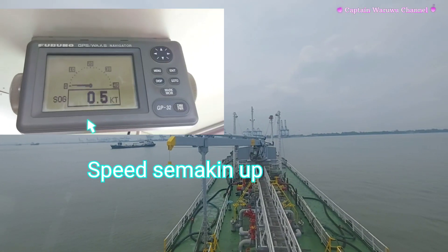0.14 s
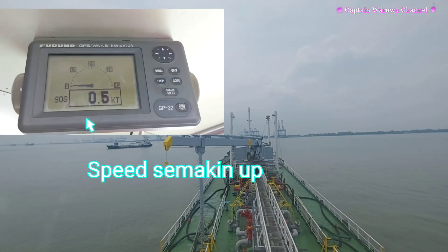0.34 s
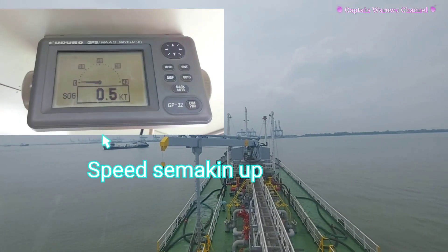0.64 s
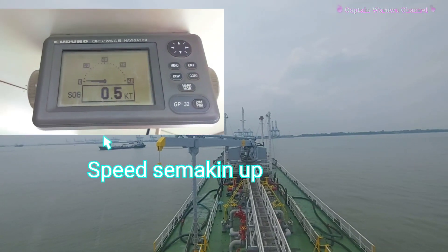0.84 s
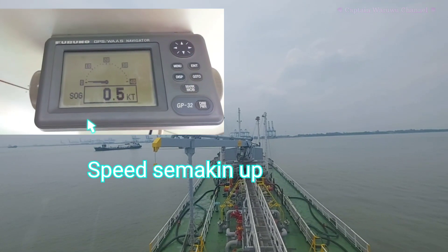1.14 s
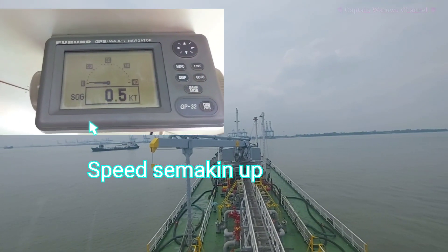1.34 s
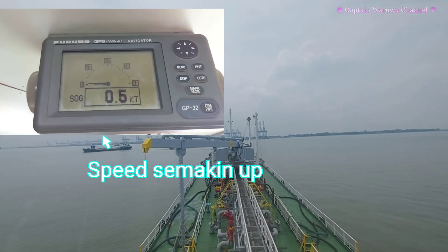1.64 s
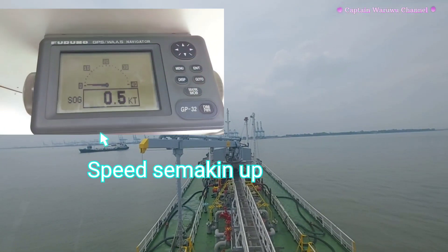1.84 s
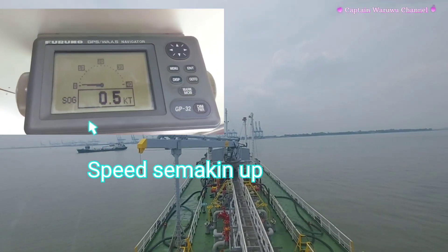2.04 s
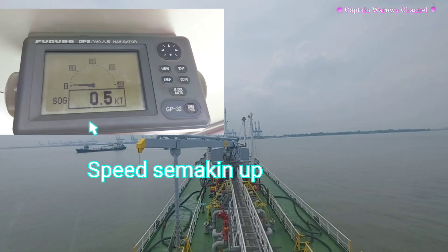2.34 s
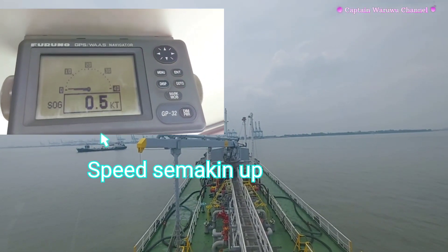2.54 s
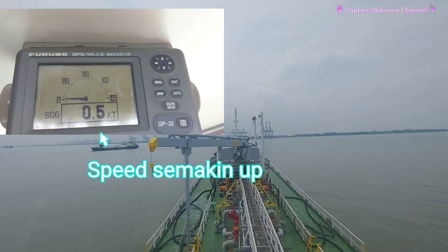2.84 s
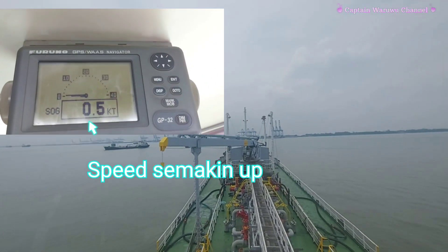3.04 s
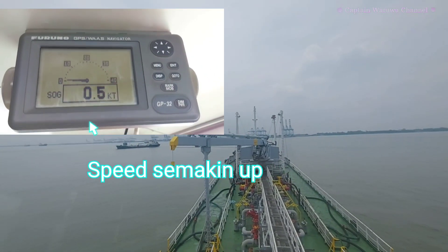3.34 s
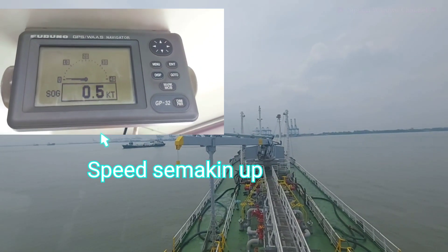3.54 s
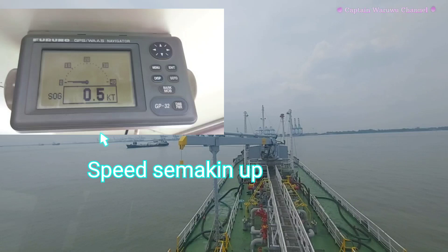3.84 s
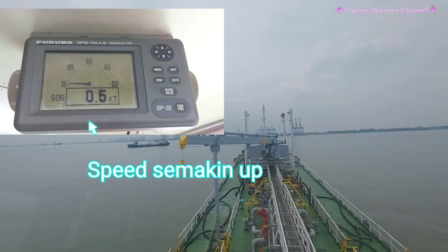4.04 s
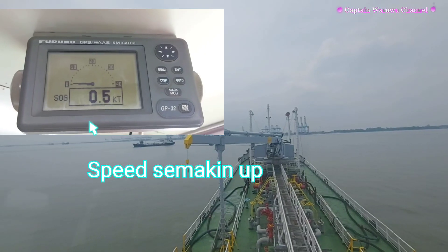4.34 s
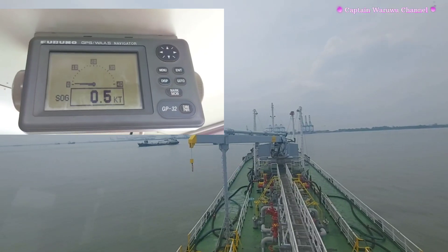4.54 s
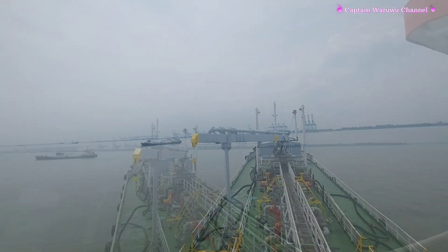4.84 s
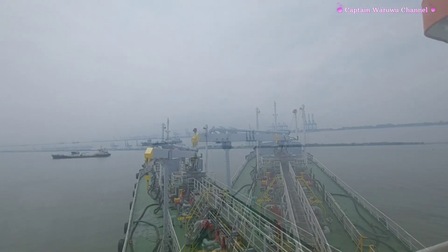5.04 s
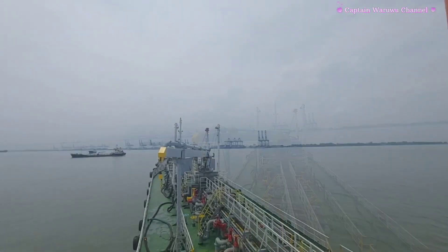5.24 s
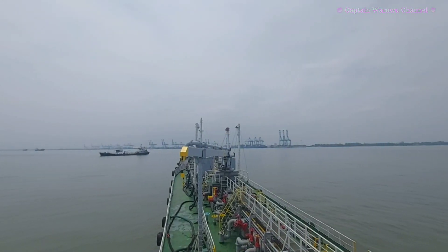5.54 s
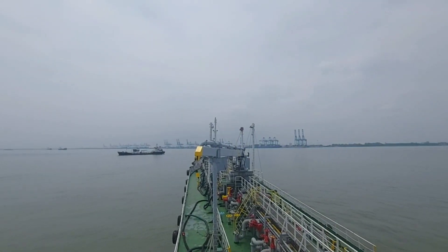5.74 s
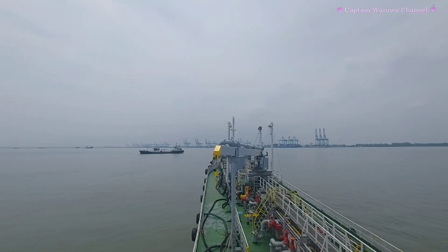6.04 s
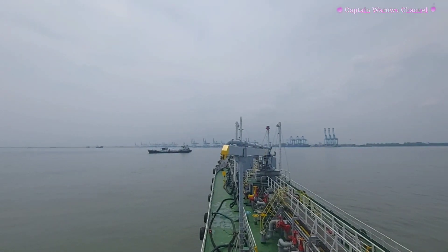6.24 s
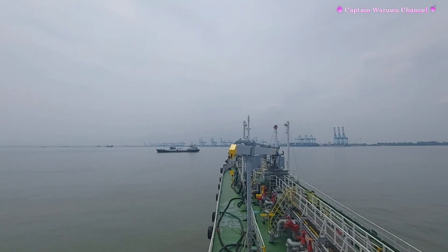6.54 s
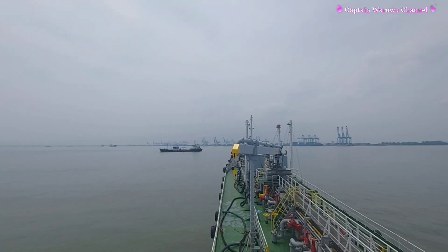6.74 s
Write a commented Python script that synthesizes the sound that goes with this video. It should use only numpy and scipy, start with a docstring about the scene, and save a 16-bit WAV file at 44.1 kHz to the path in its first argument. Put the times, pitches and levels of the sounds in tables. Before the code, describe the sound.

A ship's diesel throbs low and buzzes in the wheelhouse with faint rustles, dips to near silence, then returns louder, deeper and steadier.

```python
"""A slow diesel throbs ten times a second, buzzing and rustling; after a fade it booms, louder and even.
A ship's engine is heard from the wheelhouse at two places in turn, one fading right out before the other.
Engine: orders of the four-stroke cycle, rumble pulsing with the firing, and knocks, all shaped by the hull.
Other machines: slightly wandering tones that beat with it. Rustles: short swells of noise grains,
and so are two ticks, the last led in by a faint treble swell."""
import sys
import numpy as np
from scipy import signal
from scipy.fft import rfft, irfft, next_fast_len
from scipy.io import wavfile
from scipy.ndimage import uniform_filter1d

SR = 44100
rng = np.random.default_rng(int(sys.argv[2]) if len(sys.argv) > 2 else 0)


def wrap_up_sound(samples):
    """Save the sound to the file named by the first command line argument, as 16-bit audio."""
    columns = np.atleast_2d(samples).T
    # keep every value between -1 and 1, then stretch to whole-number steps
    tamed = np.clip(columns, -1, 1)
    steps = np.round(tamed * 32767).astype(np.int16)
    wavfile.write(sys.argv[1], SR, steps)


N = 303221

CYCLE_HZ = 9.9265  # four-stroke cycles per second
CYLINDERS = 6  # each fires once a cycle
# likeness of left and right: (frequency [Hz], correlation [-1..1])
LIKENESS = [(60, 0.99), (180, 0.95), (310, 0.81), (540, 0.6), (940, 0.28), (1400, -0.26), (2800, 0.076),
            (5000, -0.18), (9000, 0.94)]


def amp(db):
    """Amplitude ratio of a level in dB."""
    return 10 ** (np.asarray(db) / 20)


def read(points, hz, axis=1):
    """One column of a table, joined by lines on a log-frequency axis."""
    table = np.transpose(points)
    return np.interp(np.log(hz + 1), np.log(table[0] + 1), table[axis])


def likeness(hz):
    """Left-right correlation at a frequency."""
    return read(LIKENESS, hz)


def drift(rate_hz, size=1024):
    """Slow random wander with an rms of one."""
    hz = np.fft.rfftfreq(size, N / SR / size)
    slow = irfft(rfft(rng.standard_normal(size)) * np.exp(-(hz / rate_hz) ** 2), size)
    slow = (slow - slow.mean()) / slow.std()
    return np.interp(np.linspace(0, size - 1, N), np.arange(size), slow)


def noise_pair(density_db, same):
    """Left and right noise from rules for dB per Hz and for correlation."""
    size = next_fast_len(N, True)
    hz = np.fft.rfftfreq(size, 1 / SR)
    a, b = rfft(rng.standard_normal((2, size)))
    correlation = np.clip(same(hz), -1, 1)
    mid = a * np.sqrt((1 + correlation) / 2)
    side = b * np.sqrt((1 - correlation) / 2)
    spectrum = np.array([mid + side, mid - side]) * amp(density_db(hz)) * np.sqrt(SR / 2)
    return irfft(spectrum, size)[:, :N]


def engine(place, buzz_db, uneven_db, buzz_top_hz, chuff, waver, bass_tilt_db, treble_tilt_db, paths=3):
    """The cycle repeats at a governed speed, over a rumble that swells with the firing."""
    turns = CYCLE_HZ * np.arange(N) / SR + 0.00073 * drift(2.8)
    hz, orders = order_spectrum(place, buzz_db, uneven_db, buzz_top_hz)
    hum = repeat(orders, turns)
    # loose paths come and go: each order wavers in its own way, far less below 120 Hz
    loose = waver * np.minimum(hz / 120, 1) ** 3
    for _ in range(paths):
        path_phase = np.exp(2j * np.pi * rng.random(len(hz)))
        hum += drift(6.8) * repeat(orders * loose * path_phase, turns)
    # every firing, and every second one
    firing = np.cos(2 * np.pi * 6 * turns) + np.cos(2 * np.pi * 3 * turns)
    rumble = noise_pair(lambda hz: hull_db(hz, place), likeness) * (1 + chuff * firing)
    diesel = swell(hum + rumble + knocks(turns, place))
    return lean(diesel + auxiliaries(place), bass_tilt_db, treble_tilt_db)


def order_spectrum(place, buzz_db, uneven_db, buzz_top_hz, count=2049):
    """Left and right orders: strong low ones and a dense comb of weak ones from buzzing panels."""
    buzz_low_hz = (513, 415)[place]  # below this the panels hardly buzz
    # unequal cylinders raise a hump of low orders between the first two firing harmonics
    throb_db, throb_hz, throb_width_hz = (-46.5, -60)[place], 100, 8.9
    singing_drive_db = (4, 3)[place]
    in_step_hz = (125, 200.6)[place]  # orders below this arrive together, as one thump
    # hum just under the firing note, beating with it once a cycle, and its double octave:
    # (engine order, level at first place [dB], level at second [dB])
    beat_hum = [(5, -46.5, -65.5), (20, -52.5, -58.5)]
    # fittings that sing with the nearest order: (frequency [Hz], level before the drive is added [dB])
    singing_first = [(158.8, -58), (208.5, -65), (268, -65.5), (347.4, -70), (436.8, -67.5), (446.7, -68),
                     (456.6, -70), (496.3, -70), (506.3, -64.5), (516.2, -69.5), (685, -73), (705.2, -69.5),
                     (794, -77.5), (804, -69), (861.3, -62.5), (893, -75), (942.1, -70), (974.4, -67.5),
                     (1093, -70), (1102, -74), (1362, -76), (1965, -80), (3226, -90), (4020, -91),
                     (4815, -96)]
    # same columns, second place
    singing_second = [(99.3, -51.5), (168.8, -59.5), (208.5, -59.5), (287.9, -57), (456.6, -69),
                      (484.5, -65.5), (496.3, -67.5), (506.3, -69.5), (586.8, -71), (794, -69.5),
                      (802.1, -67), (920.5, -72), (942.1, -69), (974.4, -70.5), (1003, -74), (1052, -76.5),
                      (1093, -79), (1163, -74), (1233, -70.5)]

    hz = np.arange(count) * CYCLE_HZ
    scatter_db = uneven_db * np.clip(rng.standard_normal(count), -2, 1.35)
    level_db = hull_db(hz, place) + buzz_db + scatter_db
    level_db -= 10 * np.log10(1 + (hz / buzz_top_hz) ** 2 + (buzz_low_hz / (hz + 1)) ** 2)
    level_db = np.maximum(level_db, throb_db - ((hz - throb_hz) / throb_width_hz) ** 2)
    for order, *db in beat_hum:
        level_db[round(order)] = db[place]
    level_db[::CYLINDERS] = np.maximum(level_db[::CYLINDERS], firing_db(hz[::CYLINDERS], place))
    for line_hz, db in (singing_first, singing_second)[place]:
        level_db[round(line_hz / CYCLE_HZ)] = db + singing_drive_db
    # low orders arrive in step with the firing, the rest by many paths through the hull
    phase = np.where(hz < in_step_hz, -hull_lag(hz, place), 2 * np.pi * rng.random(count))
    apart = np.arccos(np.clip(likeness(hz), -1, 1)) * rng.choice([-1, 1], count) / 2
    phases = phase + np.array([apart, -apart])
    return hz, amp(level_db) * np.exp(1j * phases) * (hz > 0)


def firing_db(hz, place):
    """Firing-note harmonics: level up to a corner, falling steadily above it, lifted by the panels."""
    base_db, corner_hz = (-38.5, -26)[place], (118.2, 97.9)[place]
    fall_db_per_octave = (45, 20.5)[place]
    steepness = fall_db_per_octave / (10 * np.log10(2))
    return base_db - 10 * np.log10(1 + (hz / corner_hz) ** steepness) + panel_db(hz, place)


def hull_lag(hz, place):
    """Each hull mode the thump passes through delays the orders well above it by half a turn."""
    # one list per place: (frequency [Hz], width [Hz])
    hull_modes = ([(72, 7.7), (94, 0.77)], [(125, 7)])
    return sum(np.pi / 2 + np.arctan(2 * (hz - mode_hz) / width_hz)
               for mode_hz, width_hz in hull_modes[place])


def repeat(orders, turns):
    """Sums the orders into one engine cycle and plays it round and round."""
    cycle = irfft(orders, norm="forward") / np.sqrt(2)
    grid = np.linspace(0, 1, cycle.shape[1], endpoint=False)
    return np.array([np.interp(turns % 1, grid, side) for side in cycle])


def hull_db(hz, place):
    """What the steel structure passes to a place, in dB per Hz."""
    # machinery and ventilation rumble before panel lift:
    # (frequency [Hz], density at first place [dB per Hz], density at second [dB per Hz])
    rumble = [(25, -72, -74.5), (44.7, -84, -79), (68.4, -66.5, -65), (90.4, -63, -67), (105, -76, -63.5),
              (119.3, -68, -63), (130, -69.5, -68), (187, -74.5, -77.5), (257, -79.5, -78),
              (377, -83, -81.5), (654, -81.5, -86.5), (1136, -87, -87), (1247, -97, -92), (2220, -99, -97),
              (3380, -107.5, -102.4), (5530, -112.5, -107.5), (7400, -119, -113), (13000, -120.5, -118.5),
              (15100, -126, -121.5)]
    low_cut_db = 10 * np.log10(1 + (20 / (hz + 1)) ** 4)
    return read(rumble, hz, axis=1 + place) + panel_db(hz, place) - low_cut_db


def panel_db(hz, place):
    """The lift that the panel resonances give at a place."""
    # (frequency [Hz], width [Hz], lift at first place [dB], lift at second [dB])
    panels = [(145.5, 8.3, 9.5, 0), (170.3, 22, 7, 0.5), (234, 15, 8, -0.5), (294.2, 14.2, 14.5, 10.5),
              (326.1, 29, 9, 10), (453, 17, 8, 8), (496.4, 30, 7.5, 8), (1395, 60, 8, 0.5),
              (1916, 515, 6, 4), (1954, 58, 2.5, -1.5), (2292, 53, 5.5, -2), (4300, 250, 1.5, 3)]
    return sum(row[2 + place] / (1 + (2 * (hz - row[0]) / row[1]) ** 2) for row in panels)


def knocks(turns, place, count=3):
    """Short dull knocks, evenly spaced in the cycle and unequal in strength, carried by the hull."""
    over_rumble_db, uneven_db = (5, -5)[place], 2
    delay_s, rise_s, decay_s = .014, .0008, 0.0041
    low_hz, top_hz = 443, 2600
    knock, part = np.divmod((turns - delay_s * CYCLE_HZ + 1) * count, 1)
    scatter = np.clip(rng.standard_normal(N // 1000), -2, 2)
    strength = amp(over_rumble_db + uneven_db * scatter)

    def density_db(hz):
        return hull_db(hz, place) - 10 * np.log10(1 + (low_hz / (hz + 1)) ** 4 + (hz / top_hz) ** 4)

    steel = noise_pair(density_db, likeness)
    since_s = part / (count * CYCLE_HZ)
    envelope = (1 - np.exp(-(since_s / rise_s) ** 2)) * np.exp(-since_s / decay_s)
    return steel * strength[knock.astype(int)] * envelope


def swell(x):
    """The clatter swells and sinks a little while the hum holds, and single panels surge."""
    # clatter gain: (time [s], level [dB])
    clatter_level = [(0, 0.5), (0.8, -0.3), (2, 0.8), (2.6, 0.5), (3.4, 0.2), (4.6, 0), (6.1, -1),
                     (6.7, -0.8)]
    # panels that ring up for a while:
    # (frequency [Hz], width [Hz], centre time [s], time to 1/e of the lift [s], lift [dB])
    panel_surges = [(305, 29, 1.4, .5, 2), (295, 24, 3, 0.5, 3), (494, 40, 2.1, .2, 3),
                    (1960, 160, 2.56, .45, 3), (480, 70, 5.95, .25, 2.5), (311, 45, 6.76, .3, 1.5)]
    t = np.arange(N) / SR
    highpass = signal.butter(2, 220, "high", fs=SR, output="sos")
    clatter = signal.sosfiltfilt(highpass, x)
    out = x + clatter * (amp(np.interp(t, *np.transpose(clatter_level))) - 1)
    for hz, width_hz, at_s, length_s, lift_db in panel_surges:
        panel = signal.lfilter(*signal.iirpeak(hz, hz / width_hz, fs=SR), x)
        out = out + panel * (amp(lift_db * np.exp(-((t - at_s) / length_s) ** 2)) - 1)
    return out


def lean(x, bass_db, treble_db):
    """Standing waves in the cabin favour one side, by frequency."""
    size = next_fast_len(N, True)
    # (frequency [Hz], left minus right [dB])
    tilt = [(60, bass_db), (100, 0.6), (800, 0.87), (2000, treble_db), (5000, treble_db), (9000, 0)]
    half_db = read(tilt, np.fft.rfftfreq(size, 1 / SR)) / 2
    return irfft(rfft(x, size) * amp([half_db, -half_db]), size)[:, :N]


def auxiliaries(place):
    """Pumps and generators each hum one slightly wandering tone and beat slowly with the engine."""
    wander_turns, wander_hz = 0.077, 0.83  # rms phase wander and its rate
    # (frequency [Hz], level at first place before the tilt [dB], at second [dB])
    machines = [(57.4, -62.5, -57), (71.5, -64, -66.5), (83.5, -69, -51), (87.6, -49, -61),
                (115, -51, -57.5), (117.7, -44.5, -71), (122.3, -63, -67), (142.9, -54, -71),
                (171, -58.5, -71), (176.5, -57.5, -70.5), (231.2, -67.5, -71), (237.6, -61.5, -76),
                (288.2, -61, -70), (491.5, -67.5, -67)]
    t = np.arange(N) / SR
    hum = 0
    for hz, *db in machines:
        turns = hz * t + rng.random() + wander_turns * drift(wander_hz)
        hum = hum + amp(db[place]) * np.sqrt(2) * np.cos(2 * np.pi * turns)
    return hum


def rustles(grain=0.84, clump_db=-0.7, spread=0.44, size=32768, count=200):
    """Each stroke is a short swell of clumped friction grains that dies away into a dull cabin tail."""
    ring_hz, ring_width_hz = 8500, 1300  # the rubbed surface rings faintly
    top_slope = 7.4  # steepness of a stroke's upper edge
    tail_db, tail_s, tail_hz = -3.5, 0.049, 5000
    out = np.zeros((2, N))
    t, hz = np.arange(size) / SR, np.fft.rfftfreq(size, 1 / SR)
    ring = 1 / (1 + (2 * (hz - ring_hz) / ring_width_hz) ** 2)
    for s, db, rise_s, decay_s, low_hz, high_hz, ring_db in strokes():
        clump = uniform_filter1d(rng.standard_normal(size), count) * np.sqrt(count)
        roughness = np.exp(grain * np.clip(rng.standard_normal(size), -2, 2))
        grains = rng.standard_normal((2, size)) * roughness * amp(clump_db * clump)
        band = ((1 + (low_hz / (hz + 1)) ** 8) * (1 + (hz / high_hz) ** top_slope)) ** -.5
        mid, side = irfft(rfft(grains) * band * amp(ring_db * ring))
        dull_band = band / (1 + (hz / tail_hz) ** 2)
        dull = irfft(rfft(rng.standard_normal((2, size))) * dull_band) * grains.std()

        start = max(round(s * SR) - size // 4, 0)  # leaves room for the rise
        since_s = t + start / SR - s
        onset = np.exp(-(np.minimum(since_s, 0) / rise_s) ** 2)
        after_s = np.maximum(since_s, 0)
        direct = np.exp(-after_s / decay_s) * np.array([mid + spread * side, mid - spread * side])
        tail_gain = amp(tail_db) * np.sqrt((rise_s + decay_s) / tail_s)
        tail = tail_gain * np.exp(-after_s / tail_s) * dull
        stroke = amp(db) * onset * (direct + tail) / mid.std()
        out[:, start:start + size] += stroke[:, :N - start]
    return out


def strokes():
    """Rustling strokes nearby, then two ticks, the last led in by a faint treble swell."""
    # (crest time [s], crest rms of direct mid [dB], rise [s], decay [s], lowest [Hz], highest [Hz],
    # ring lift [dB])
    rustle_strokes = [(.005, -46, 0.012, 0.022, 550, 1900, 5), (.41, -76, .015, 0.036, 7900, 10000, 13),
                      (.516, -65, 0.016, 0.05, 4200, 10500, 4), (.68, -78, 0.027, .05, 2500, 6500, 0),
                      (1.215, -72, 0.036, 0.049, 10800, 15000, 0),
                      (1.34, -71.5, 0.039, .06, 10000, 15000, 0), (1.465, -74, .05, 0.057, 10800, 15000, 0),
                      (1.615, -63.5, .04, 0.043, 1600, 3700, 0), (1.635, -76, 0.055, .05, 4000, 9000, 5),
                      (1.657, -60.5, 0.027, 0.032, 1500, 3200, 5),
                      (1.695, -70.5, 0.033, 0.045, 8000, 14500, -3),
                      (1.8, -74, .025, .035, 10800, 15000, 0), (1.91, -71, .028, .06, 8500, 14500, -3),
                      (1.985, -75, 0.039, .042, 10000, 15000, 0),
                      (2.235, -68.5, 0.024, 0.086, 6000, 13500, -4),
                      (2.47, -65.5, 0.039, 0.058, 2700, 13000, -6), (2.6, -82, 0.068, 0.082, 1800, 2500, 3),
                      (3.578, -56.5, 0.011, 0.046, 2300, 11300, 3), (3.597, -63, .02, 0.053, 2600, 4300, 0),
                      (4.58, -62, 0.065, 0.065, 1600, 2700, 12)]
    # a tick, a treble swell and a second tick; same columns without the ring
    ticks_and_swell = [(5.902, -66, .001, .001, 9500, 13300), (6.393, -65, .012, .007, 9000, 13500),
                       (6.398, -50, .0004, .0006, 1500, 14000)]
    return rustle_strokes + [(*row, 0) for row in ticks_and_swell]


def scene():
    """The first place fades right out, then the second fades in; rustles and ticks lie over both."""
    middle_s, fade_out_s, fade_in_s = 5.052, 0.37, 0.41
    t = np.arange(N) / SR
    first = engine(place=0, buzz_db=6.5, uneven_db=4.0, buzz_top_hz=3650, chuff=0.055, waver=0.063,
                   bass_tilt_db=-2.5, treble_tilt_db=-3.0)
    second = engine(place=1, buzz_db=12.0, uneven_db=3.0, buzz_top_hz=1500, chuff=0.065, waver=0.04,
                    bass_tilt_db=-0.3, treble_tilt_db=-5.5)
    fade_out = np.clip((middle_s - t) / fade_out_s, 0, 1)
    fade_in = np.clip((t - middle_s) / fade_in_s, 0, 1)
    return first * fade_out + second * fade_in + rustles()


def record(dry):
    """Band limit: a linear-phase lowpass at 15.75 kHz."""
    lowpass = signal.firwin(511, 15750, window=("kaiser", 9), fs=SR)
    return signal.oaconvolve(dry, lowpass[None], "same")


dry = scene()
out = record(dry)
wrap_up_sound(out)
```